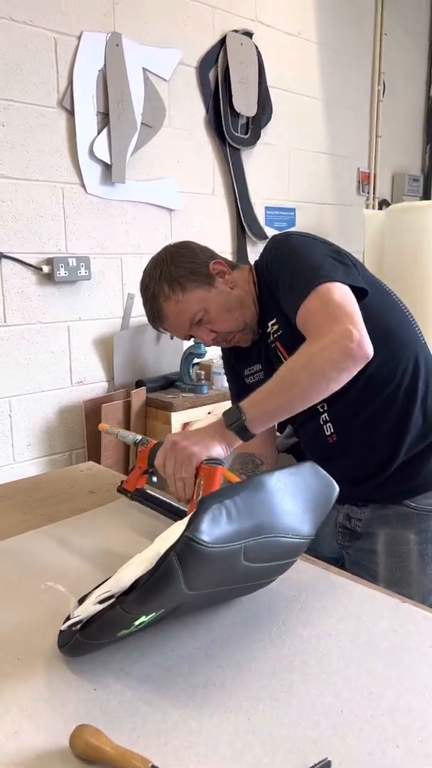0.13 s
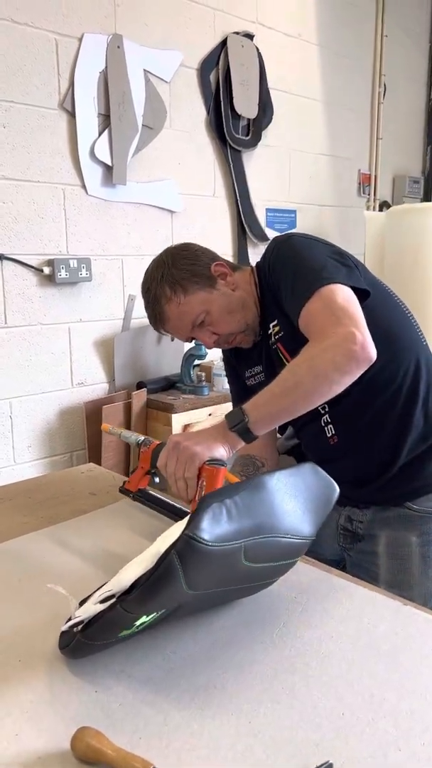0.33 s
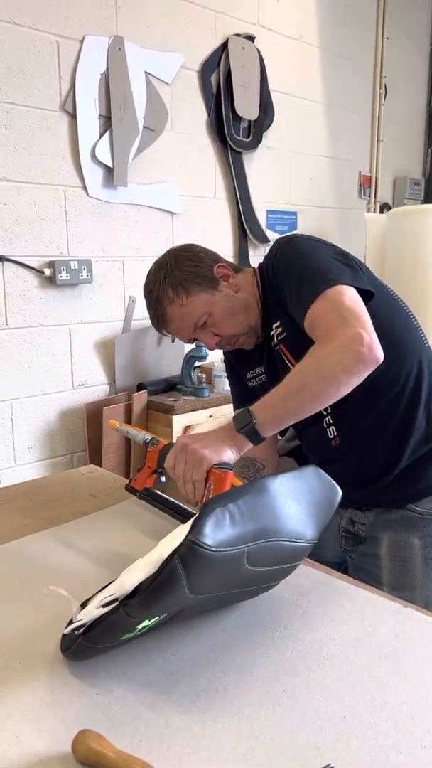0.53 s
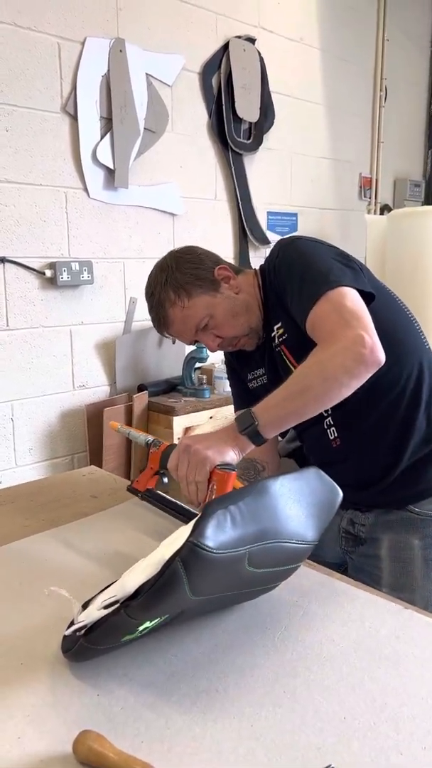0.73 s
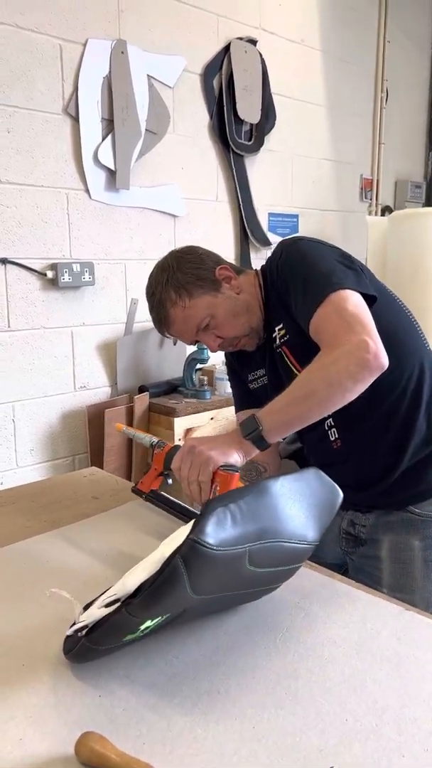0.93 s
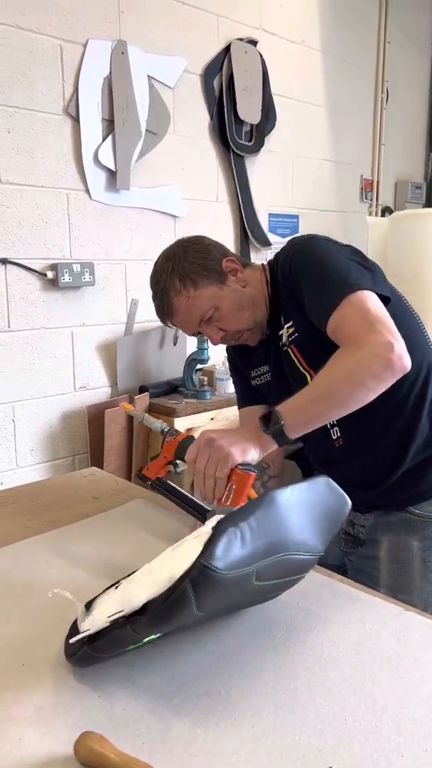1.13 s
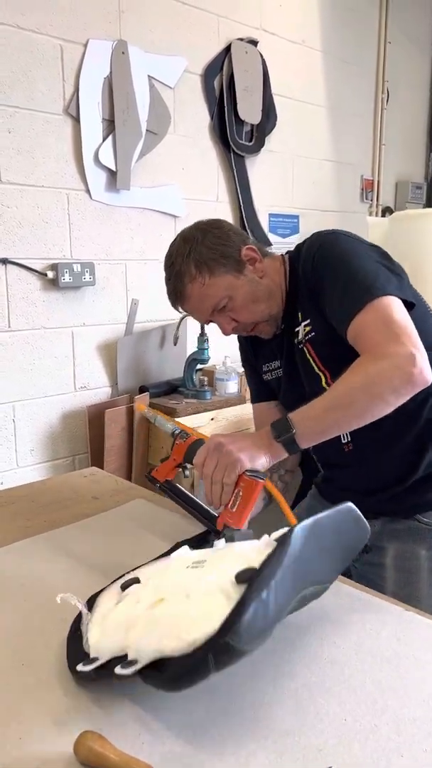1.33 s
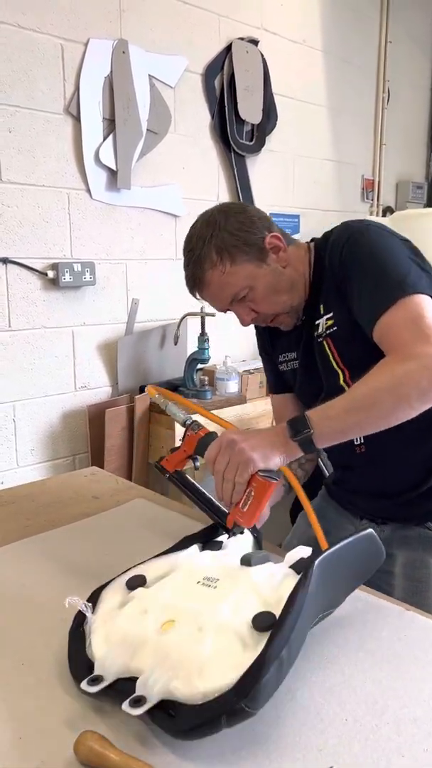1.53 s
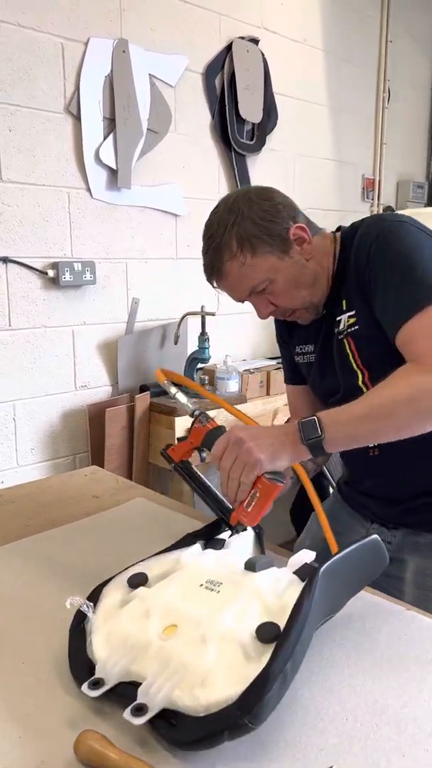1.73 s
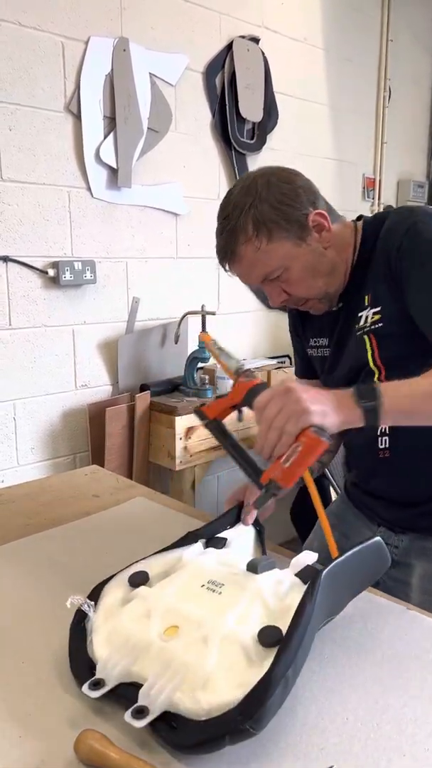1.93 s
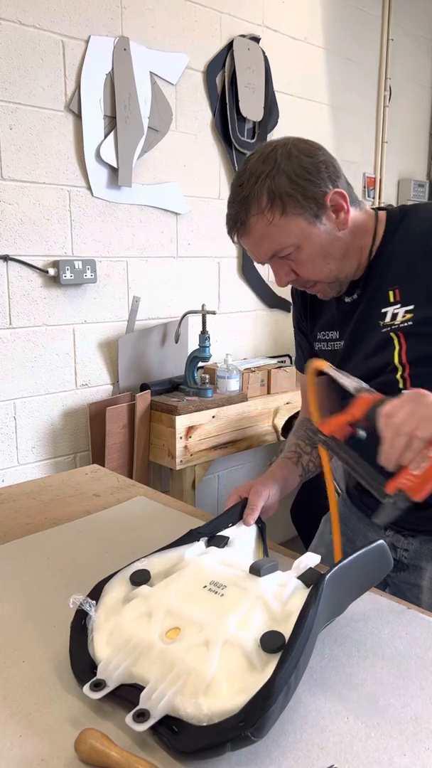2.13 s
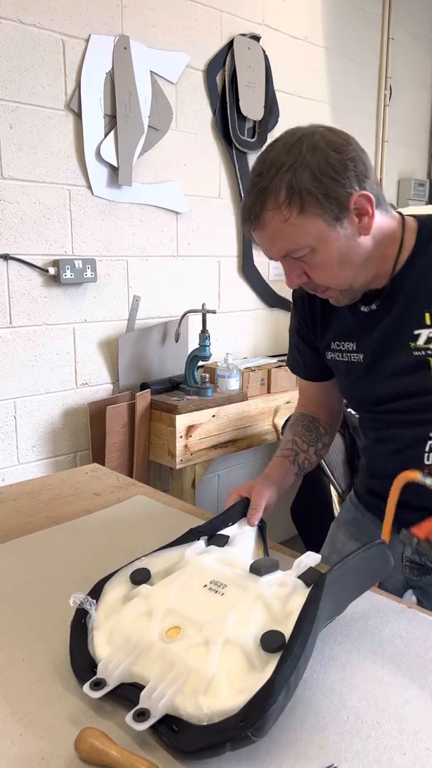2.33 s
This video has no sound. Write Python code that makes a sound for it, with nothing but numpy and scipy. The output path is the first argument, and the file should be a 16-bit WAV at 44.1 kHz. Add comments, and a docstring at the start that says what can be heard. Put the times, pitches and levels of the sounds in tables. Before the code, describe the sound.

An air stapler fires twice into a plastic seat pan. After low rumble and a brief valve hiss, a sharp metallic crack and thump land at 0.2 s, with a piston clack and exhaust spit at 0.4. The second shot comes at 0.88, its exhaust at 1.05. Bare walls ring and flutter. Dull seat bumps follow around 1.3, then quieter bumps and faint sliding until about 2.4.

```python
"""Low workshop rumble and a wavering hum come first, then a short valve hiss leads into an air stapler's shot.
It drives two staples into the plastic pan of a motorcycle seat: clusters of noise blows, ringing gun, sagging thumps.
As the trigger is let go, the piston knocks home in damped modes and the exhaust spits shaped noise.
The bare block walls ring on in decaying noise, with flutter echoes and a sinking whoosh after each shot.
The seat is turned over on the bench with soft modal bumps and sliding noise; gain control ducks the loud peaks."""
import sys
import numpy as np
from scipy import signal
from scipy.fft import rfft, irfft
from scipy.io import wavfile
from scipy.ndimage import uniform_filter1d

SR = 44100
rng = np.random.default_rng(int(sys.argv[2]) if len(sys.argv) > 2 else 0)


def to_wav(s):
    """Save 16-bit WAV."""
    ch = np.atleast_2d(s).T  # columns
    pcm = np.round(np.clip(ch, -1, 1) * 32767)  # PCM
    wavfile.write(sys.argv[1], SR, pcm.astype(np.int16))


N = 105840
TIME, HZ = np.arange(N) / SR, np.fft.rfftfreq(2 * N, 1 / SR)
PATHS = 3  # independent noise paths into the room

# workshop background (frequency [Hz], gain before the change [dB], gain after it [dB])
AIR_COLOUR = [(20, -63.5, -69), (72, -25, -38), (163, -48, -55.5), (601.6, -57.5, -65), (970, -55.5, -65.5),
              (1602, -66.5, -70), (7040, -79, -74), (15000, -94.5, -94)]
# low workshop hum (frequency [Hz], level [dB])
HUM_TONES = [(64.6, -73), (107.7, -72)]
HUM_WAVER, HUM_WAVER_HZ = .35, 5  # depth (level fraction and radians), fastest drift
# faint buzzing hiss
BUZZ_HZ, BUZZ_DECAY_S, BUZZ_BAND_HZ = 125.4, 0.00248, (4800, 8400)
BUZZ_PEAK_S, BUZZ_SPAN_S, BUZZ_DB = 2.2, .13, -58.5  # level before the band filter

# reverberation of the workshop (frequency [Hz], time to fall 60 dB [s])
ROOM_DECAY = [(60, 0.72), (200, 0.5), (900, 0.59), (5500, 0.59), (9000, 0.51), (15000, .42)]
GAP_S, BUILD_S = 0.016, 0.0032  # before the walls answer, and their build-up
NEAR_DB = -3.5  # early scatter off bench and seat
# low room modes stirred by the exhaust (frequency [Hz], level [dB], time to fall 60 dB [s])
BOOM_MODES = [(65, -43.5, .95), (87, -46, .6)]

# the moment each staple goes in ([s])
SHOT_TIMES = [.2056, .8823]
# hollow whoosh that sinks in pitch after each shot
WHOOSH_HZ, WHOOSH_SAG_HZ_PER_S, WHOOSH_WIDTH_HZ = 1051, 2500, 220
WHOOSH_DELAY_S, WHOOSH_DB, WHOOSH_T60_S = 0.035, -21, 0.5
# echoes after each shot (delay [s], level [dB])
FLUTTER_ECHOES = [(0.032, -2), (0.055, -3.5)]
# hollow tone of the echoes (frequency [Hz], level [dB], time to fall 60 dB [s])
FLUTTER_TONE = [(990, -4, 0.063)]

# hose and sleeve slide (time [s], level before colouring [dB])
SLIDE_LEVEL = [(1.5, -74.5), (1.55, -64.5), (1.66, -70), (2.08, -102), (2.25, -67), (2.4, -75.5)]
# colour of the slide (frequency [Hz], gain [dB])
SLIDE_TONE = [(100, 8.5), (300, 13.5), (2500, 3), (10000, -4), (15000, -20)]
# the seat bumps on the bench (time [s], level [dB])
SEAT_BUMPS = [(1.297, -29.5), (1.347, -24.5), (1.533, -45), (2.012, -57.5), (2.357, -49.5)]
# resonances of the seat (frequency [Hz], level [dB], time to fall 60 dB [s])
SEAT_MODES = [(71.43, -20.5, 0.27), (197.5, -2, 0.0509), (349.2, -0.5, 0.0427), (674, -1, 0.01907)]
SEAT_ROOM_DB = -7.5

# air leaks as the trigger valve opens (time [s], length [s], level before colouring [dB])
VALVE_LEAKS = [(0.175, 0.047, -39), (0.865, 0.012, -37)]
# colour of the leaks (frequency [Hz], gain [dB])
LEAK_TONE = [(300, 1.5), (1000, -3.5), (3000, 1.5), (10000, 1.5)]

# exhaust puffs (time [s], direct level before colouring [dB], room level before colouring [dB])
EXHAUST_PUFFS = [(.3930, 0, 2), (1.052, -1, -2.5)]
# colour of the exhaust (frequency [Hz], direct gain [dB], room gain [dB])
EXHAUST_COLOUR = [(35, -11, -13.5), (71, 0.5, 2.5), (162.1, 1.5, -10), (265, 7, 4), (333, 11, 12),
                  (564, 2, -1.5), (737, -4.5, -8.5), (1400, -1, -8), (2900, 0, -4), (7600, -1, -1),
                  (12300, 0, -4.5), (15500, -3, -13.5)]
# each puff opens at a fraction of full flow, peaks, holds and decays
PUFF_START, PUFF_PEAK_S, PUFF_HOLD_S, PUFF_DECAY_S = 0.21, .005, .004, 0.0059
# resonances of the exhaust cap (frequency [Hz], lift [dB])
CAP_PEAKS = [(3450, 1), (3880, 4.5), (4270, 2), (5650, 5)]
CAP_WIDTH_HZ = 61  # half width of each peak
# the piston knocks home and rebounds (time [s], level [dB])
PISTON_KNOCKS = [(.3928, -8.5), (.3970, -1.5), (.4020, -5.5), (.4150, 3), (1.0548, -7.5), (1.0600, -4.5),
                 (1.0725, 0.5)]
# resonances of the piston knock (frequency [Hz], level [dB], time to fall 60 dB [s])
PISTON_MODES = [(238.7, -15, 0.061), (380, -8, 0.039), (1944, -7.5, 0.033), (4240, -13.5, 0.053)]
PISTON_ROOM_DB = -21

# driver and staple thump the seat pan (time [s], level [dB], starting pitch [Hz])
PAN_PUNCHES = [(0.2052, -4, 596), (0.2117, -2.5, 740), (0.8794, -8, 974), (0.8829, -5.5, 616),
               (0.8874, -5.5, 620)]
PAN_HZ, PAN_SETTLE_S, PAN_RISE_S, PAN_T60_S = 185, 0.0023, .001, 0.043
PAN_ROOM_DB = -12.5
# blows of valve, piston and driver (time [s], level before colouring [dB], treble tilt [dB per octave])
STROKE_BLOWS = [(0.2005, -18, 4), (0.205, -0.5, 1), (0.2091, 1.5, 0.5), (0.2112, -7.5, -5.5),
                (0.8786, -4.5, -3.5), (0.8822, -5, 1.5), (0.887, 1, -1.5), (0.8887, -1, 2),
                (.8930, -4, -1.5)]
BLOW_DECAY_S = .002
# colour of a blow (frequency [Hz], direct gain [dB], room gain [dB])
BLOW_TONE = [(39.97, -0.5, -11.5), (85, -1, -1.5), (140, -1.5, -9.5), (213, 2.5, 3.5), (482, 7, 5.5),
             (970, 10, 14), (1330, 7.5, 3), (2660, 10, 4.5), (3970, 3, 4), (7400, -3, -3.5),
             (11700, -0.5, -8.5), (15450, -4.5, -18)]
# the gun's body under a blow (frequency [Hz], level [dB], time to fall 60 dB [s])
GUN_MODES = [(1014, -22.5, 0.17), (2050, -23, .07), (2290, -23, 0.21)]
GUN_ROOM_DB = -15.5

# how left and right relate (frequency [Hz], likeness in the room [-1 to 1], left lead [rad], left minus right
# [dB]); the top row sets left and right opposed, so above about 12.8 kHz the treble sits only at the sides and
# the centre falls silent
MIC_PAIR = [(200, .99, 0, .5), (400, .92, -.15, 1), (650, .65, -.5, -4), (1000, .35, 0, -4),
            (1900, .65, -.1, -1), (2900, .35, -1.6, 0), (3400, .7, -.1, 0), (4400, .8, -.2, 0),
            (5050, .35, -1.5, 0), (5900, .85, 0, 0), (7200, .97, -.05, 0), (10000, .7, -1.4, 0),
            (12850, 1, -3.1, 0)]
DIRECT_SPREAD = 0.86  # share of the room's unlikeness given to direct sound
KNEE_DB, SQUEEZE, RECOVER_DB_PER_S = -26, .33, 29
CEILING, EDGE_HZ = .85, 16200  # soft peak limit, top of the band


def amp(db):
    """Decibels to gain."""
    return 10 ** (np.asarray(db) / 20)


def read(table, hz, order=1):
    """One column of a table, on a log-frequency axis."""
    rows = np.array(table, float)
    return np.interp(np.log(hz + 1), np.log(rows[:, 0] + 1), rows[:, order])


def colour(x, db):
    """Causal minimum-phase filter with the given gain at each frequency."""
    cepstrum = irfft(np.log(amp(db)))
    cepstrum[1:N] *= 2  # fold the response forward in time
    cepstrum[N + 1:] = 0
    response = np.exp(rfft(cepstrum))
    return irfft(rfft(x, 2 * N) * response)[..., :N]


def since(s):
    """Seconds since a moment, zero before it."""
    return np.maximum(TIME - s, 0)


def ring(hits, modes, rise_s=1e-5):
    """Half a second of damped modes for each hit; a soft contact swells over rise_s."""
    t = TIME[:SR // 2]
    tone = sum(amp(db - 60 * t / t60) * np.sin(2 * np.pi * hz * t) for hz, db, t60 in modes)
    tone = tone * (1 - np.exp(-t / rise_s))
    out = np.zeros(N)
    for s, db in hits:
        part = out[round(s * SR):][:len(tone)]
        part += amp(db) * tone[:len(part)]
    return out


def background():
    """Low workshop rumble and faint hiss; the lows settle while some treble lifts."""
    noise = rng.standard_normal((2, N))
    late = np.interp(TIME, [1.2, 1.75], [0, 1])
    before = colour(noise, read(AIR_COLOUR, HZ))
    after = colour(noise, read(AIR_COLOUR, HZ, order=2))
    return (1 - late) * before + late * after


def hum():
    """Low sine tones whose level and phase waver with slow noise."""
    noise = rfft(rng.standard_normal((len(HUM_TONES), 2, N)))
    drift = irfft(noise * (np.fft.rfftfreq(N, 1 / SR) < HUM_WAVER_HZ), N)
    drift = HUM_WAVER * drift / drift.std()
    return sum(amp(db) * (1 + level) * np.sin(2 * np.pi * hz * TIME + phase)
               for (hz, db), (level, phase) in zip(HUM_TONES, drift))


def buzz():
    """A faint hiss in quick decaying pulses, swelling and fading around one moment near the end."""
    pulses = np.exp(-(TIME % (1 / BUZZ_HZ)) / BUZZ_DECAY_S)
    swell = amp(BUZZ_DB) * np.exp(-abs(TIME - BUZZ_PEAK_S) / BUZZ_SPAN_S)
    hiss = rng.standard_normal((2, N)) * pulses * swell
    return signal.lfilter(*signal.butter(1, BUZZ_BAND_HZ, "bandpass", fs=SR), hiss)


def room(paths):
    """Each path gets early scatter and its own dense tail from the walls, each band dying at its own speed."""
    noise = rng.standard_normal((len(paths), 2, SR))
    hz, t, bands = signal.stft(noise, SR, nperseg=256)
    decay = amp(-60 * t / read(ROOM_DECAY, hz)[:, None])
    tail = signal.istft(bands * decay, SR, nperseg=256)[1][..., :SR]
    tail = tail * np.clip((TIME[:SR] - GAP_S) / BUILD_S, amp(NEAR_DB), 1)
    tail = tail / np.linalg.norm(tail[:, 0])
    return signal.fftconvolve(paths[:, None], tail, axes=2).sum(0)[:, :N]


def boom():
    """Low room modes swell and ring under each exhaust puff."""
    return ring([(s, db) for s, db, _ in EXHAUST_PUFFS], BOOM_MODES, rise_s=.02)


def whoosh():
    """Noise in a resonance that falls up to an octave and fades after each shot."""
    lowpass = signal.butter(2, WHOOSH_WIDTH_HZ / 2, fs=SR, output="sos")
    out = 0
    for s in SHOT_TIMES:
        t = since(s + WHOOSH_DELAY_S)
        noise = rng.standard_normal((2, N)) + 1j * rng.standard_normal((2, N))
        band = signal.sosfilt(lowpass, noise)
        pitch_hz = np.maximum(WHOOSH_HZ - WHOOSH_SAG_HZ_PER_S * t, WHOOSH_HZ / 2)
        turns = np.cumsum(pitch_hz) / SR
        tone = (band * np.exp(2j * np.pi * turns)).real / band.real.std()
        fade = np.minimum(t / BUILD_S, 1) * amp(WHOOSH_DB - 60 * t / WHOOSH_T60_S)
        out = out + tone * fade
    return out


def flutter():
    """Distinct hollow echoes of each shot, rung as a soft damped mode."""
    echoes = [(s + delay, db) for s in SHOT_TIMES for delay, db in FLUTTER_ECHOES]
    return ring(echoes, FLUTTER_TONE, rise_s=0.0026)


def handling():
    """The seat bumps in soft damped modes and the hose slides as noise: (direct, into the room)."""
    seat = ring(SEAT_BUMPS, SEAT_MODES, rise_s=0.00355)
    level = amp(np.interp(TIME, *np.transpose(SLIDE_LEVEL), left=-120))
    direct = colour(rng.standard_normal((2, N)) * level, read(SLIDE_TONE, HZ))
    direct[0] += seat  # channel 0 is the centre of the pair
    return direct, amp(SEAT_ROOM_DB) * seat[None]


def leaks():
    """A short noise hiss at the trigger valve ahead of each shot."""
    flow = sum(amp(db) * (TIME > s) * (TIME < s + length) for s, length, db in VALVE_LEAKS)
    hiss = rng.standard_normal((2, N)) * uniform_filter1d(flow, 100)
    return colour(hiss, read(LEAK_TONE, HZ))


def cap(hz):
    """Lift in dB from the resonances of the exhaust cap, less a small overall trim."""
    return sum(db / (1 + ((hz - centre) / CAP_WIDTH_HZ) ** 2) for centre, db in CAP_PEAKS) - .5


def exhaust():
    """The cylinder dumps its air as noise while the piston knocks home: (direct, into the room)."""
    noise, near, far = rng.standard_normal((PATHS, N)), 0, 0
    for s, db, room_db in EXHAUST_PUFFS:
        t = since(s)
        rise = np.minimum(PUFF_START + t / PUFF_PEAK_S * (1 - PUFF_START), 1)
        fall = np.exp(-since(s + PUFF_PEAK_S + PUFF_HOLD_S) / PUFF_DECAY_S)
        flow = (t > 0) * rise * fall
        near = near + amp(db) * flow
        far = far + amp(room_db) * flow
    piston = ring(PISTON_KNOCKS, PISTON_MODES, rise_s=0.00034)
    direct = colour(noise[:2] * near, read(EXHAUST_COLOUR, HZ) + cap(HZ))
    direct[0] += piston
    diffuse = colour(noise * far, read(EXHAUST_COLOUR, HZ, order=2) + cap(HZ))
    return direct, diffuse + amp(PISTON_ROOM_DB) * piston


def thump(s, db, start_hz):
    """The plastic pan gives under a blow: its pitch drops quickly to that of the whole shell."""
    t = since(s)
    bend = (start_hz - PAN_HZ) * PAN_SETTLE_S * (1 - np.exp(-t / PAN_SETTLE_S))
    turns = PAN_HZ * t + bend
    swell = 1 - np.exp(-t / PAN_RISE_S)
    return -amp(db - 60 * t / PAN_T60_S) * swell * np.sin(2 * np.pi * turns)


def cracks():
    """Each blow of the drive stroke is a decaying noise burst with its own treble tilt."""
    crack, t = np.zeros((PATHS, N)), TIME[:SR // 20]
    octaves = np.log2(np.clip(np.fft.rfftfreq(len(t), 1 / SR), 500, 12000) / 2500)
    for s, db, tilt_db in STROKE_BLOWS:
        spectrum = rfft(rng.standard_normal((PATHS, len(t))))
        noise = irfft(spectrum * amp(tilt_db * octaves), len(t))
        crack[:, round(s * SR):][:, :len(t)] += amp(db) * noise * np.exp(-t / BLOW_DECAY_S)
    return crack


def shots():
    """Cracks of the drive stroke ring the gun and punch the seat pan: (direct, into the room)."""
    crack = cracks()
    gun = ring([(s, db) for s, db, _ in STROKE_BLOWS], GUN_MODES)
    pan = sum(thump(*row) for row in PAN_PUNCHES)
    direct = colour(crack[:2], read(BLOW_TONE, HZ))
    direct[0] += gun + pan + flutter()
    diffuse = colour(crack, read(BLOW_TONE, HZ, order=2))
    return direct, diffuse + amp(GUN_ROOM_DB) * gun + amp(PAN_ROOM_DB) * pan


def ports(pair, spread=1):
    """Two unrelated signals become the left and right of a close microphone pair."""
    mid, side = rfft(pair, 2 * N)
    same = np.clip(1 - spread * (1 - read(MIC_PAIR, HZ)), -1, 1)
    mid, side = mid * np.sqrt((1 + same) / 2), side * np.sqrt((1 - same) / 2)
    # half the phase and level difference goes to each side
    lean = np.exp(.5j * read(MIC_PAIR, HZ, order=2)) * amp(read(MIC_PAIR, HZ, order=3) / 2)
    return irfft(np.array([(mid + side) * lean, (mid - side) / lean]))[:, :N]


def scene():
    """Direct sound and room at the microphone pair, over boom and hum."""
    sources = [handling(), exhaust(), shots()]
    direct = sum(near for near, far in sources) + leaks()
    diffuse = background() + buzz() + whoosh() + sum(room(far) for near, far in sources)
    return ports(direct, DIRECT_SPREAD) + ports(diffuse) + boom() + hum()


def record(dry):
    """Gain control ducks above a knee and recovers steadily; peaks are rounded off; then the band limit."""
    power = uniform_filter1d((dry ** 2).mean(0), size=130)
    power_db = 10 * np.log10(abs(power) + 1e-12)
    fall = TIME * RECOVER_DB_PER_S
    # the deepest duck so far, easing back at the recovery rate
    duck_db = np.maximum.accumulate(SQUEEZE * np.maximum(power_db - KNEE_DB, 0) + fall) - fall
    ducked = dry * amp(-uniform_filter1d(duck_db, size=130))
    rounded = CEILING * np.tanh(ducked / CEILING)
    lowpass = signal.firwin(511, EDGE_HZ, window=("kaiser", 9), fs=SR)
    return signal.oaconvolve(rounded, lowpass[None], "same")


dry = scene()
out = record(dry)
to_wav(out)
```